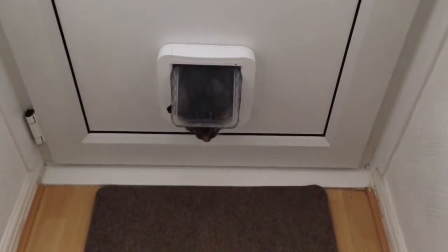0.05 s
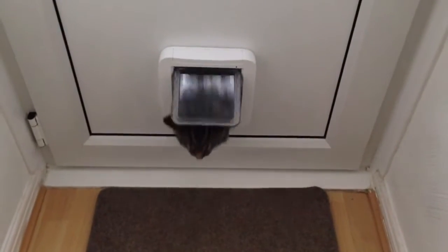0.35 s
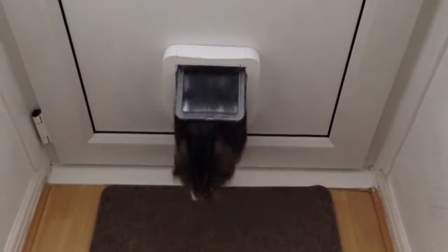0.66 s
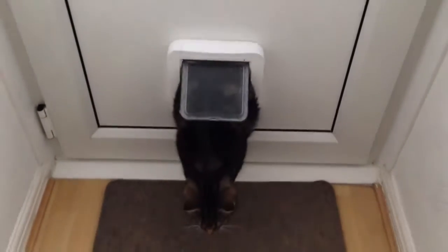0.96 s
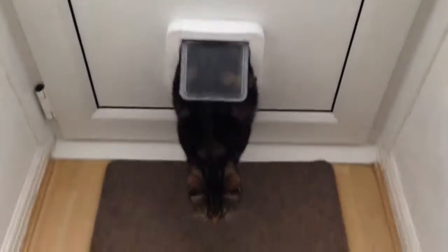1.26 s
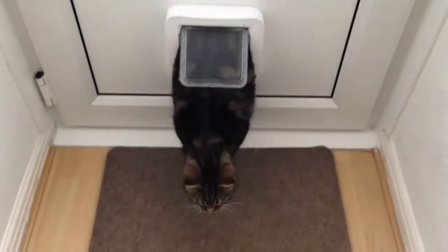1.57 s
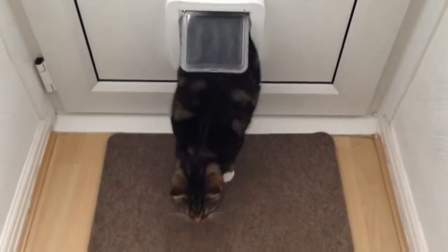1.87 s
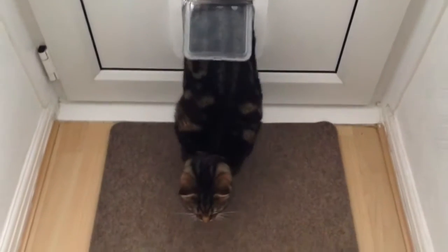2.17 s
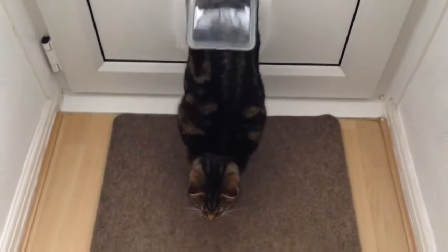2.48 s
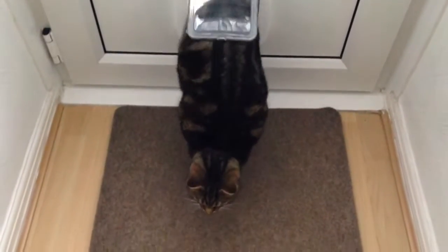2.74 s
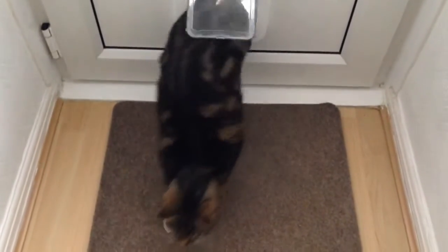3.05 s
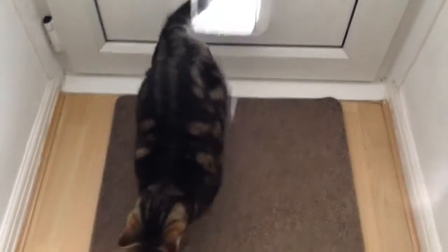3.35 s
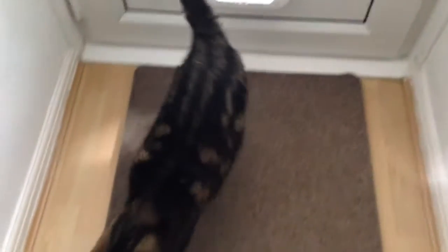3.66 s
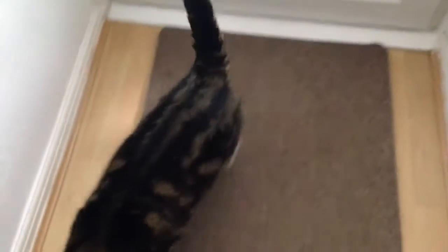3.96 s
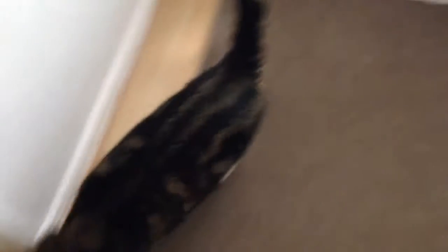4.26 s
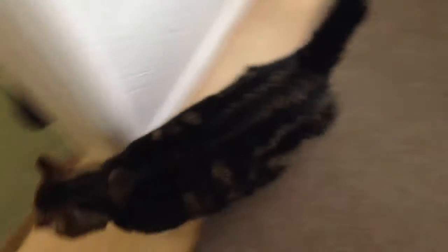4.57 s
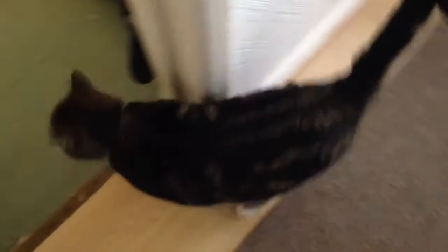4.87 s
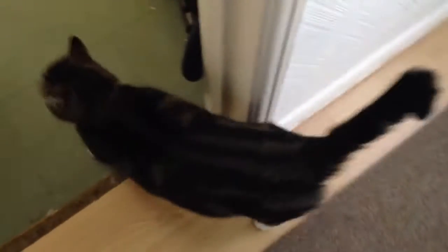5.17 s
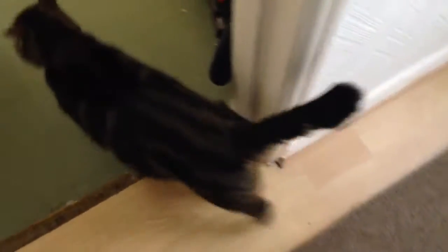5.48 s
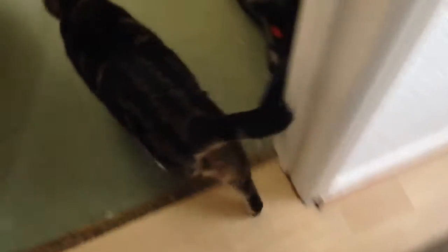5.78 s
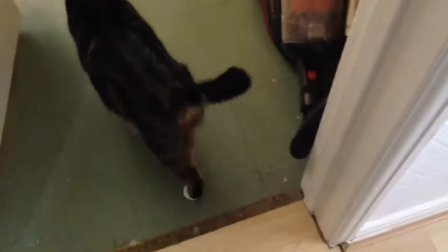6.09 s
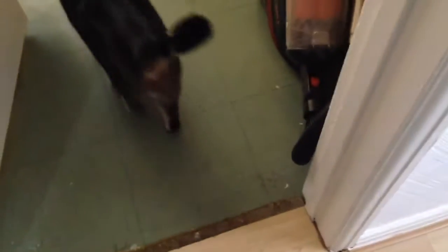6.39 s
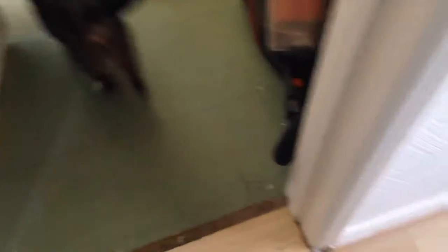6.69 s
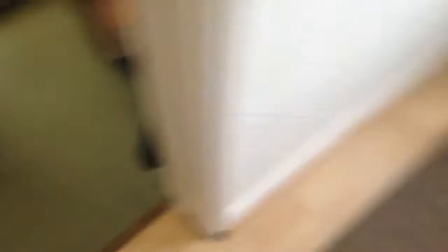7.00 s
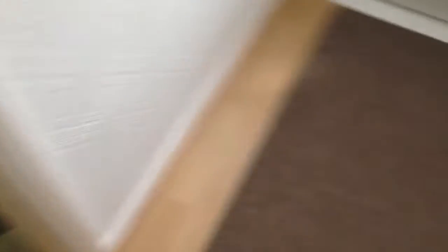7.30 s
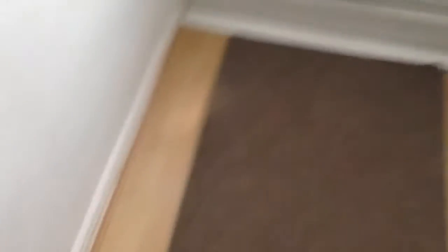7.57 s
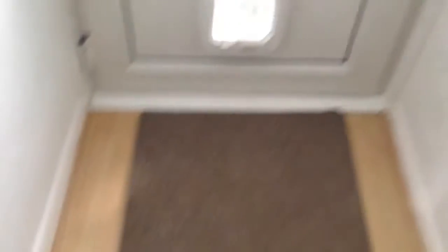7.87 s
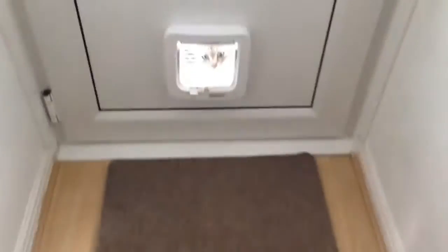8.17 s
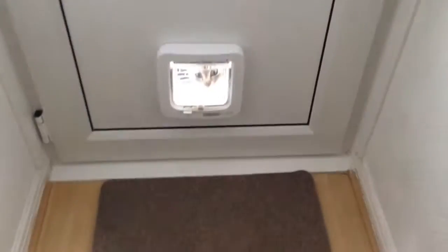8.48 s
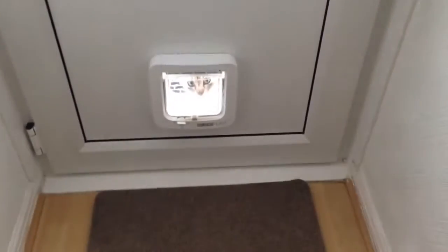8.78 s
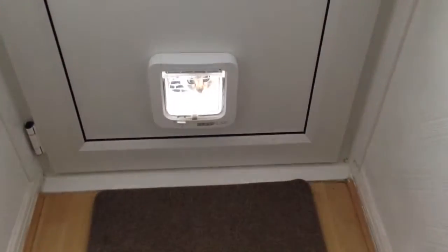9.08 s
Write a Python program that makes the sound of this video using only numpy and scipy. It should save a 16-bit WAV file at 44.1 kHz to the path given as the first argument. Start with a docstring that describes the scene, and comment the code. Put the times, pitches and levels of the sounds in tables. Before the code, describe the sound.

Plastic clacks and hollow door bumps from a cat flap, followed by a light, fading collar jingle in a quiet hall.

```python
"""A cat through a cat flap

A cat noses through a plastic flap in a back door, a metre away in a small hall. Impacts excite damped
modes: the flap rattles on its catch, the cat bumps the hollow door, and the flap drops off its back and
slams. Friction makes plastic scuff and fur hiss. A bell and a metal tag tinkle on the collar as the cat
walks off into a room where an appliance hums, and a sleeve rustles once."""
import sys
import numpy as np
from scipy import signal
from scipy.fft import rfft, irfft, next_fast_len
from scipy.io import wavfile

SR = 44100
rng = np.random.default_rng(int(sys.argv[2]) if len(sys.argv) > 2 else 0)


def file_out(sig):
    """Save sig as 16-bit WAV at sys.argv[1]."""
    # one column per channel
    cols = np.atleast_2d(sig).T
    # limit, then scale
    lim = np.clip(cols, -1, 1)
    pcm = np.round(lim * 32767).astype(np.int16)
    wavfile.write(sys.argv[1], SR, pcm)


N = 411894
TIME = np.arange(N) / SR
RING = np.arange(SR) / SR  # time axis of one second of ring-out
CAT_CLEAR_S = 3.6  # the cat's hips leave the tunnel


def amp(db):
    """Amplitude ratio of a level in decibels."""
    return 10 ** (np.asarray(db) / 20)


def fade(t60):
    """Exponential decay of 60 dB in t60 seconds."""
    return np.exp(-np.log(1000) * RING / t60)


def add(track, s, sound):
    """Superposition: a sound adds to the track from time s."""
    i = max(int(s * SR), 0)
    track[i:i + len(sound)] += sound[:N - i]


def curve(rows, fade_db_per_s=6):
    """Level contour through (time [s], level [dB]) rows, falling away outside their span."""
    s, db = np.transpose(rows)
    outside_s = np.abs(TIME - np.clip(TIME, s[0], s[-1]))
    return np.interp(TIME, s, db) - fade_db_per_s * outside_s


def wander(count):
    """Random modulation: straight lines through count Gaussian values spread over the scene."""
    return np.interp(np.arange(N), np.linspace(0, N, num=count), rng.standard_normal(count))


def shape(points, hz):
    """Spectral envelope: the gain at hz from (frequency [Hz], level [dB]) points."""
    f, db = np.transpose(points)
    return amp(np.interp(np.log(hz + 1), np.log(f), db))


def noise(points, size):
    """White noise filtered by a spectral envelope, at unit rms."""
    padded = next_fast_len(size)
    spectrum = rfft(rng.standard_normal(padded)) * shape(points, np.fft.rfftfreq(padded, 1 / SR))
    x = irfft(spectrum, padded)[:size]
    return x / x.std()


def resonate(x, hz, width_hz):
    """Forced response of one resonator, at unit rms."""
    y = signal.lfilter(*signal.iirpeak(hz, hz / width_hz, fs=SR), x)
    return y / y.std()


def ring(modes, colour, scatter_db, detune):
    """Free vibration: a sum of damped modes whose strength, sign and tuning vary with each contact."""
    hz, db, t60 = np.transpose(modes)
    strength, sign, tuning = rng.standard_normal((len(hz), 3)).T
    gains = amp(db) / np.linalg.norm(amp(db)) * colour * amp(scatter_db * strength) * np.sign(sign)
    out = np.zeros(SR)
    for gain, f, life in zip(gains, hz * (1 + detune * tuning), t60):
        t = RING[:int(life * SR)]
        out[:len(t)] += gain * np.sin(2 * np.pi * f * t) * np.exp(-np.log(1000) * t / life)
    return out


# spectrum of the quiet hall: (frequency [Hz], relative level [dB])
AIR_SPECTRUM = [(18, -31), (30, -2), (55, -4.5), (102, -8.5), (202, -5), (332, -11), (1020, -24.5),
                (1970, -23), (5040, -18.5), (15500, -23.5)]


def hall_air(db=-66):
    """Ambient noise: steady, broadband and strongest in the bass."""
    return amp(db) * noise(AIR_SPECTRUM, N)


# plastic rubbing on its frame: (time [s], length before the tail [s], relative level [dB], resonance [Hz])
RUBS = [(0.031, 0.081, -45.5, 890), (0.277, 0.055, -43, 766), (0.334, 0.061, -38.5, 1000),
        (2.372, 0.013, -43.5, 1360), (3.044, 0.04, -56, 786), (3.405, 0.091, -42, 324),
        (3.418, 0.034, -52.5, 1080), (3.796, 0.073, -51, 760)]


def rubbing(slips_per_s=5000, width_hz=240, broad_db=-11):
    """Stick-slip friction: dense tiny slips drive one resonance of the pane over a dull scuff."""
    out = np.zeros(N)
    for s, length, db, hz in RUBS:
        slips = rng.standard_normal(SR) * (rng.random(SR) < slips_per_s / SR)
        swell = np.interp(RING, [0, length / 2, length, 2 * length], [0.044, 0.56, 0.19, 0])
        scuff = resonate(slips, hz, 2 * hz)
        rub = resonate(scuff, hz, width_hz) + amp(broad_db) * resonate(scuff, hz, 2 * hz)
        add(out, s, amp(db) * swell * rub)
    return out


def hip_bumps(start_s=2.5, end_s=3.0, per_s=9, db=-53):
    """A jittered impulse train from the hips squeezing through: (time [s], level [dB])."""
    times = start_s + (np.arange(32) + rng.random(32)) / per_s
    return [(s, db) for s in times if s < end_s]


# modes of the hollow door: (frequency [Hz], relative level [dB], T60 [s])
DOOR_MODES = [(37, -12, .7), (62, -1, .24), (78, -11, .16), (140, -6, .22), (165, -5, .26), (211, 0, .25),
              (257, -7, .18), (312, 1, .22), (338, -3, .13), (388, -4, .15)]
# soft blows on the door: (time [s], level [dB], relative level of the upper modes [dB])
KNOCKS = [(0.085, -39.5, -10), (.427, -38, 1), (0.701, -38, 1), (.787, -42, -17), (0.809, -39, -1),
          (1.188, -44.5, -34), (2.284, -49, -13.5), (2.770, -51.5, -1), (2.98, -43.5, -5),
          (3.074, -40, -6.5), (3.183, -46, -6), (3.487, -32.5, 2), (3.85, -34, -5.5)]


def door(wash_db=-11, wash_t60=0.49, push_s=0.00062, pane_db=-11, coupling_db=-20, light_upper_db=-10):
    """Panel vibration: blows and coupled clacks excite the hollow door, which shakes the flap's pane."""
    out = np.zeros(N)
    door_hz, pane_hz = np.array(DOOR_MODES)[:, 0], np.array(PANE_MODES)[:, 0]
    pane_colour = shape([(1000, 3.5), (3000, -32)], pane_hz)
    from_flap = [(s, db + hollow_db + coupling_db) for s, db, hollow_db, _, _ in CLACKS]
    light = [(s, db, light_upper_db) for s, db in from_flap + hip_bumps()]
    for s, db, upper_db in list(KNOCKS) + light:
        boom_db = 3.5 if s > CAT_CLEAR_S else -12  # the whole leaf booms with no cat to cushion the flap
        colour = shape([(65, boom_db), (130, 0), (220, 0), (320, upper_db + 3)], door_hz)
        thud = ring(DOOR_MODES, colour, scatter_db=5.5, detune=0.0094)
        pane = ring(PANE_MODES, pane_colour, scatter_db=4, detune=0.011)
        wash = noise([(80, -29.5), (150, -5.5), (350, upper_db + 0.5), (560, upper_db - 13.5),
                      (1600, -28.5), (6000, -54)], SR)
        knock = thud + amp(pane_db + upper_db) * pane + amp(wash_db) * wash * fade(wash_t60)
        add(out, s, amp(db) * knock * (1 - np.exp(-RING / push_s)))
    return out


# modes of the flap's pane: (frequency [Hz], relative level [dB], T60 [s])
PANE_MODES = [(454.7, 2.5, 0.15), (775, 4, 0.095), (820, -2, 0.25), (912, 2.5, 0.13), (1056, 5, 0.079),
              (1181, 0.5, 0.11), (1292, 0, 0.11), (1397, -3.5, 0.11), (1520, -3.5, 0.099), (1757, -1, 0.12),
              (2026, 1, 0.1), (2260, -5, 0.16), (2380, -5.5, 0.11), (2456, -5.5, 0.15), (2700, -3.5, 0.096),
              (2900, -7, 0.074), (3290, 0, 0.15), (3920, 10, 0.045), (4260, 0, 0.14), (5130, -2, 0.08),
              (5600, -2, 0.067)]
# spectrum of struck plastic: (frequency [Hz], relative level [dB])
PLASTIC_SPECTRUM = [(200, -24.5), (450, -0.5), (800, -4), (1400, 0), (2500, -4.5), (4500, -2.5), (7000, -9),
                    (15000, -28)]
# the flap striking its frame: (time [s], level [dB], relative hollow low-mid [dB],
# relative sharp treble [dB], frequency favoured by the contact point [Hz])
CLACKS = [(0.111, -36.5, 0, -2.5, 4340), (0.1329, -29.5, -0.5, -2.5, 2700), (0.1414, -26, -8.5, 0, 2700),
          (0.152, -29, -3.5, -3, 760), (0.1689, -28.5, -4.5, -2, 4430), (0.353, -36, -9, -10.5, 990),
          (0.3716, -24, -9, -4, 1280), (0.3899, -30, -4.5, 0.5, 920), (0.397, -29, -13, -4, 2540),
          (0.412, -30, -4, -4, 1170), (0.456, -29, -11.5, -3, 1220), (1.2019, -36, -14.5, -9.5, 3500),
          (1.976, -54.5, 3, -26, 1490), (2.390, -30, -8, -8, 1450), (2.395, -20, -20.5, -14.5, 1550),
          (2.409, -27.5, -4.5, -26, 2370), (2.8969, -50, 1, -12, 840), (3.487, -29.5, 1.5, -6.5, 1800),
          (3.495, -27.5, -5.5, -24, 1050), (3.8223, -36.5, -1, -4, 1230), (3.8267, -27, -11.5, -8, 1150),
          (3.843, -31.5, -3, -17, 2800), (3.8644, -28, -9, -6, 2100)]


def flap(modes_db=4, crack_db=-1.5, crack_t60=0.019, wash_db=-10.5, wash_t60=0.21, treble_damping=0.18,
         favour_db=8, favour_octaves=0.15, rise_s=0.00043):
    """Impact on a plate: dense modes crack, the pane rings, and the walls return a short wash."""
    out = np.zeros(N)
    mode_hz = np.array(PANE_MODES)[:, 0]
    centres = np.geomspace(250, 14000, num=13)
    filters = [signal.butter(3, [f / 1.19, f * 1.19], "band", fs=SR, output="sos") for f in centres]
    bands = np.array([signal.sosfilt(sos, rng.standard_normal(2 * SR)) for sos in filters])
    bands *= shape(PLASTIC_SPECTRUM, centres)[:, None]
    bands /= bands.sum(axis=0).std()
    for s, db, hollow_db, sharp_db, favoured_hz in CLACKS:
        colour = [(600, hollow_db + 7), (1200, 0.015), (2700, 0.0043), (3400, sharp_db + 2.5)]
        # modes with an antinode near the contact point ring louder
        nearness = np.exp(-(np.log2(mode_hz / favoured_hz) / favour_octaves) ** 2)
        weights = shape(colour, mode_hz) * amp(favour_db * (nearness - 1))
        clack = amp(modes_db) * ring(PANE_MODES, weights, scatter_db=4, detune=0.005)
        start = rng.integers(SR)
        crack = amp(crack_db) * fade(crack_t60)
        for hz, band in zip(centres, bands):
            wash = amp(wash_db) * fade(wash_t60 * (1000 / hz) ** treble_damping)
            clack += shape(colour, hz) * band[start:start + SR] * (crack + wash)
        add(out, s, amp(db) * clack * (1 - np.exp(-RING / rise_s)))
    return out


def rattle(length, gap_s=0.009, later_db=-5, scatter_db=5):
    """Repeated impact: one contact, then lighter ones at uneven gaps, as (delay [s], gain)."""
    spacing, force = rng.random((14, 2)).T
    delays = np.cumsum(gap_s * (0.25 + 1.5 * spacing))
    taper = np.clip((length - delays) / gap_s + 1, 0, 1)
    gains = amp(later_db + scatter_db * (2 * force - 1)) * taper
    return [(0.00008, 1)] + [(delay, gain) for delay, gain in zip(delays, gains) if gain > 0]


def chime(modes, colour, splash, splash_envelope, length, detune, rise_s=0.0005):
    """Rattled metal: each contact excites the modes anew, with a noisy splash of dense, damped ones."""
    out = np.zeros(SR)
    rise = 1 - np.exp(-RING / rise_s)
    for delay, gain in rattle(length):
        tone = ring(modes, colour, scatter_db=2.5, detune=detune)
        burst = np.roll(splash, rng.integers(SR)) * splash_envelope
        contact = gain * rise * (tone + burst)
        i = int(delay * SR)
        out[i:] += contact[:SR - i]
    return out


def reflect(sound, walls_db=-7, t60=0.2):
    """Interference: echoes from near walls, new at each position of the cat, make a ring flutter."""
    echoes = (rng.standard_normal(SR) * fade(t60) * (RING > 0.003))[:SR // 4]
    return sound + amp(walls_db) * signal.fftconvolve(sound, echoes / np.linalg.norm(echoes))[:SR]


# modes of the collar bell: (frequency [Hz], relative level [dB], T60 [s])
BELL_MODES = [(2118, -28, .45), (6690, -3, .1), (6745, 0, .19), (7567, -9, .34), (9655, -17, .12),
              (11830, -16, .1), (13715, -8, .15), (14280, -6, .12)]
# spectrum of the pellet's contact: (frequency [Hz], relative level [dB])
BELL_SPLASH = [(1200, -18), (3500, 0), (7000, -1.5), (15000, -11.5)]
# pellet strikes: (time [s], level [dB], rim gain [dB], second-highest mode gain [dB], top mode gain [dB])
BELL_STRIKES = [(0.134, -34.5, -21, -10, -10), (0.376, -31.5, 0, -8, -14), (0.456, -52, 3, -16, -14),
                (1.496, -42, -6, -1, -10), (3.060, -61.5, 12, -9, -3), (3.349, -50.5, -1, 1, 7),
                (3.695, -40.5, -2.5, -2, 5), (3.996, -52.5, 6.5, -11, -4), (4.242, -49.5, 8, -9, 4),
                (4.588, -42, -6, -8, 1), (4.914, -43, 0, 10, 6), (4.963, -39.5, -11, 8.5, 6),
                (5.799, -48.5, -1, -9, -7), (6.121, -50.5, -2, -20, -10), (6.521, -50, 7, -7.5, 12),
                (7.324, -64, 10.5, -1.5, 1), (8.160, -62, 7, -3, 3), (8.948, -67, 4, 11, 12)]


def bell(bounce_s=0.013, splash_t60=0.017):
    """Shell vibration: where the pellet lands sets how much the rim and the two top modes ring."""
    out = np.zeros(N)
    splash = noise(BELL_SPLASH, SR)
    for s, db, rim_db, high_db, top_db in BELL_STRIKES:
        colour = amp([rim_db, -3, -3, rim_db, 0, 0, high_db, top_db])  # one gain a mode
        strike = chime(BELL_MODES, colour, splash, fade(splash_t60), bounce_s, detune=0.0007)
        add(out, s, amp(db) * reflect(strike))
    return out


# modes of the metal tag: (frequency [Hz], relative level [dB], T60 [s])
TAG_MODES = [(4870, -9, .06), (5005, -2, .1), (5058, 0, .125), (5180, -8, .07), (11990, -15, .12),
             (12280, -16, .1)]
# spectrum of its scraping edge: (frequency [Hz], relative level [dB])
TAG_SPLASH = [(1500, -28.5), (3400, -23.5), (4400, -3.5), (5200, 3), (5800, -16.5), (7000, -24.5),
              (15500, -30.5)]
# shakes: (time [s], level [dB], rattle length [s], relative edge splash [dB], gain of the top modes [dB])
TAG_SHAKES = [(0.222, -59.5, .04, 9.5, 2), (.760, -47.5, 0.074, -5, -4), (0.869, -41.5, 0.068, 1.5, 3),
              (1.115, -58, 0.016, 7, 9), (1.496, -29.5, 0.037, -6, -7), (1.908, -64, 0.0078, 2, 0),
              (3.107, -60, 0.003, 7, 12), (3.348, -40.5, 0.006, -7, -6), (3.694, -45, 0.043, 3.5, 1),
              (4.046, -47.5, 0.004, 7, -3), (4.121, -58, .004, 6, 12), (4.242, -41.5, .003, 3, 3),
              (4.281, -49, 0.016, 11, 4), (4.435, -56, 0.0027, -1, -5), (4.49, -55, 0.044, 2, 4),
              (4.587, -42.5, 0.012, -5, 8.5), (4.798, -49.5, 0.0097, 5.5, 2), (4.853, -57, 0.0094, 16.5, 6),
              (4.904, -41, 0.079, 5.5, 8), (5.02, -51, 0.04, 1.5, 9.5), (5.103, -37, 0.0043, -4, -16),
              (5.135, -41, 0.01, -7, -12), (5.231, -45, 0.0037, -5, -3), (5.799, -49.5, 0.014, 4.5, -9),
              (6.058, -56.5, .01, -2, -7), (6.118, -45, 0.028, -7, -17), (6.228, -57, 0.011, 2, -4),
              (6.291, -54.5, 0.0066, -1, -7), (6.38, -62.5, .011, 3, -3), (6.52, -45, 0.012, -10, -1),
              (7.324, -61.5, 0.055, 7.5, 6), (7.76, -67, .03, 6, 0), (8.947, -68.5, 0.05, 14, 2)]


def tag(splash_db=-5, splash_t60=0.065):
    """Plate vibration: taps ping, edge scrapes splash, and contact with ring and fur shifts the pitch."""
    out = np.zeros(N)
    splash = noise(TAG_SPLASH, SR)
    is_top = np.array(TAG_MODES)[:, 0] > 8000
    for s, db, length, edge_db, top_db in TAG_SHAKES:
        splash_envelope = amp(splash_db + edge_db) * fade(splash_t60)
        shake = chime(TAG_MODES, amp(top_db * is_top), splash, splash_envelope, length, detune=0.0055)
        add(out, s, amp(db) * reflect(shake))
    return out


def collar_ring(s=4.938, db=-53, hz=2401, t60=0.2):
    """A damped oscillator: the collar's ring gives one lower clink."""
    out = np.zeros(N)
    add(out, s, amp(db) * np.sin(2 * np.pi * hz * RING) * fade(t60))
    return out


# spectrum of sliding fur: (frequency [Hz], relative level [dB])
FUR_SPECTRUM = [(100, 8), (300, -2), (2000, -2.5), (5000, -5.5), (9000, -12)]
# fur sliding through the tunnel: (time [s], relative level [dB])
FUR_LEVELS = [(0.58, -69), (0.81, -63), (1.1, -74), (1.5, -79), (1.75, -67.5), (2.78, -80.5), (3.55, -68.5)]


def fur(gain_db=2.5, uneven_db=2, creaks_per_s=16, creak_db=-4.5):
    """Sliding friction: fur hisses, and draws tiny creaks from the pane while the cat is in the tunnel."""
    slips = rng.standard_normal(N) * (rng.random(N) < creaks_per_s / SR)
    creaks = signal.fftconvolve(slips, ring(PANE_MODES, 1, scatter_db=4.5, detune=0.0048))[:N]
    in_tunnel = TIME < CAT_CLEAR_S
    level = amp(curve(FUR_LEVELS) + gain_db + uneven_db * wander(count=400))
    return (noise(FUR_SPECTRUM, N) + amp(creak_db) * in_tunnel * creaks / creaks.std()) * level


# hum through the inner doorway: (time [s], relative level [dB])
HUM_LEVELS = [(5.2, -83.5), (5.74, -65.5), (6.58, -80.5), (6.74, -64.5), (7.66, -70.5), (7.7, -100)]


def appliance(hz=247, gain_db=-4.5, waver_hz=2.5, waver_db=3):
    """A modulated tone: the hum from the next room wavers in frequency and amplitude."""
    phase = 2 * np.pi * np.cumsum(hz + waver_hz * wander(count=120)) / SR
    rms = amp(curve(HUM_LEVELS) + gain_db + waver_db * wander(count=90))
    return np.sqrt(2) * rms * np.sin(phase)


# spectrum of rustling cloth: (frequency [Hz], relative level [dB])
CLOTH_SPECTRUM = [(300, -4), (1000, -6.5), (3000, -1.5), (6000, -8), (15000, -23)]


def sleeve(peak_s=7.93, db=-68, swell_s=0.18, uneven_db=1.2):
    """Friction noise: cloth rustles once under a Gaussian envelope."""
    swell = np.exp(-((TIME - peak_s) / swell_s) ** 2)
    return noise(CLOTH_SPECTRUM, N) * swell * amp(db + uneven_db * wander(count=400))


def scene():
    """Superposition of all sources at one point."""
    doorway = rubbing() + door() + flap() + fur()
    collar = bell() + tag() + collar_ring()
    return (hall_air() + doorway + collar + appliance() + sleeve())[None]


def record(dry, low_hz=32, top_hz=15500):
    """Band limiting: filters remove the deepest rumble and the highest treble."""
    thinned = signal.sosfilt(signal.butter(4, low_hz, "high", fs=SR, output="sos"), dry)
    return signal.sosfilt(signal.ellip(10, 0.2, 70, top_hz, fs=SR, output="sos"), thinned)


dry = scene()
out = record(dry)
file_out(out)
```